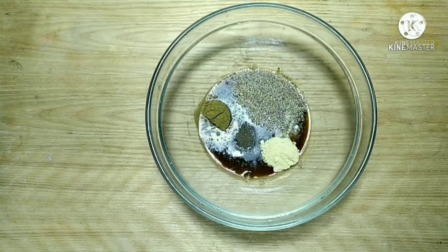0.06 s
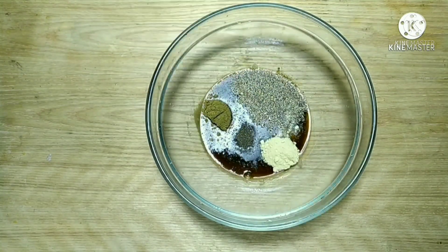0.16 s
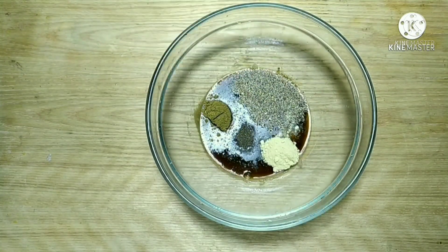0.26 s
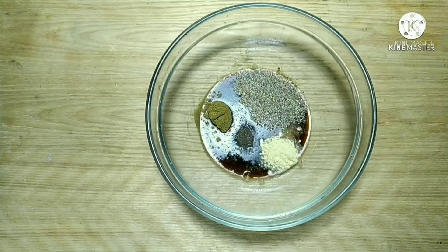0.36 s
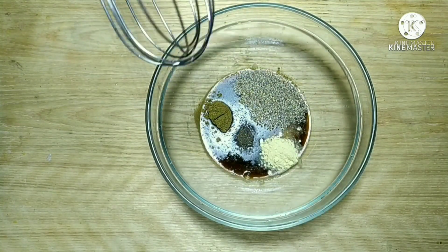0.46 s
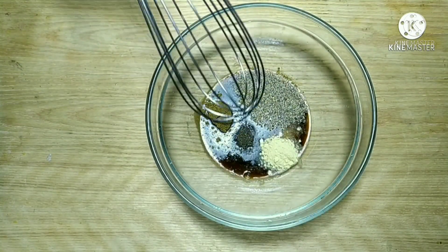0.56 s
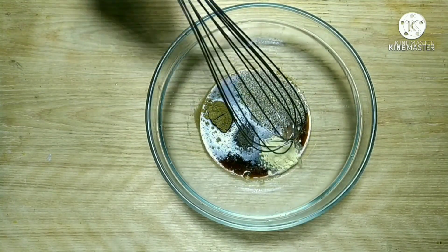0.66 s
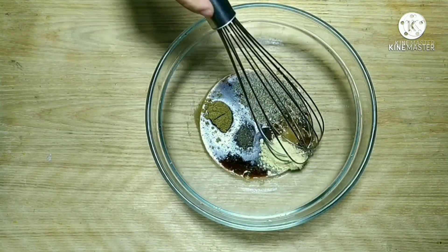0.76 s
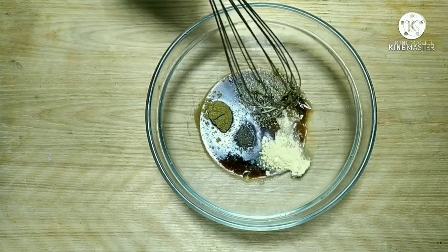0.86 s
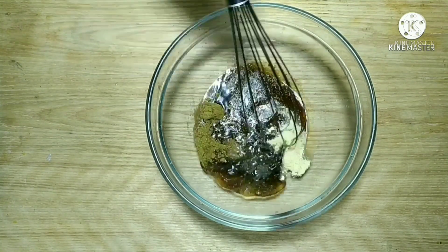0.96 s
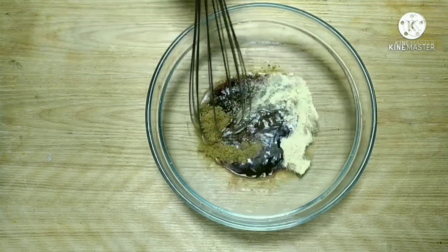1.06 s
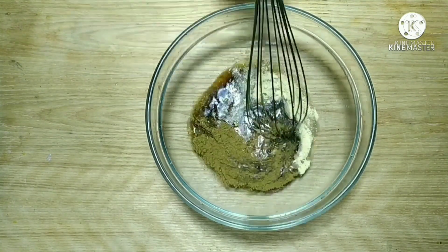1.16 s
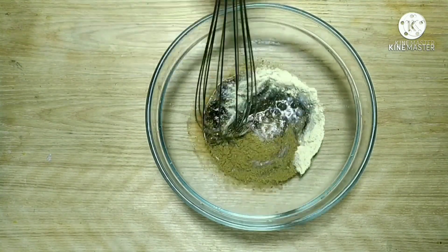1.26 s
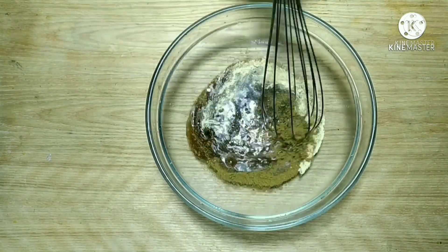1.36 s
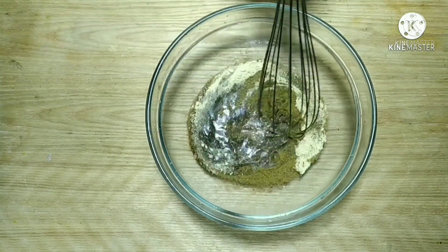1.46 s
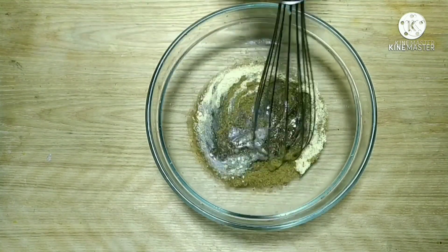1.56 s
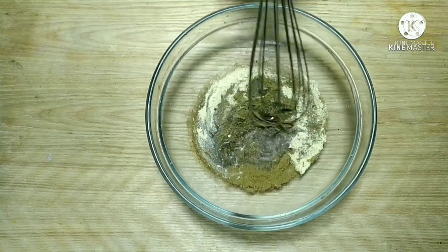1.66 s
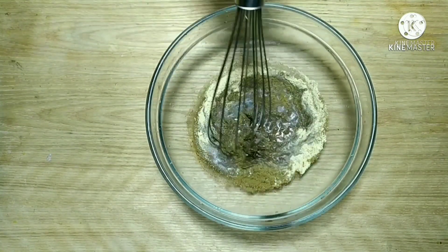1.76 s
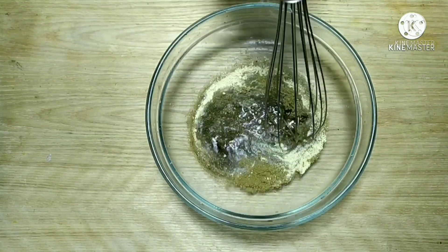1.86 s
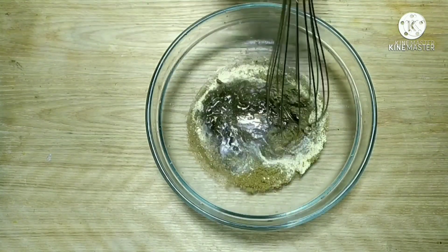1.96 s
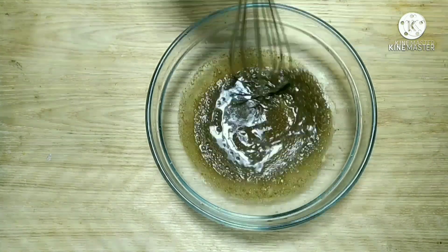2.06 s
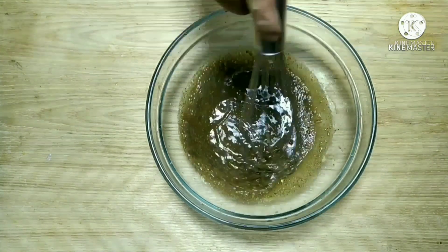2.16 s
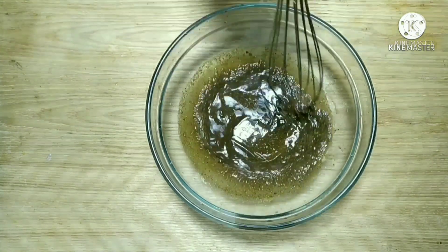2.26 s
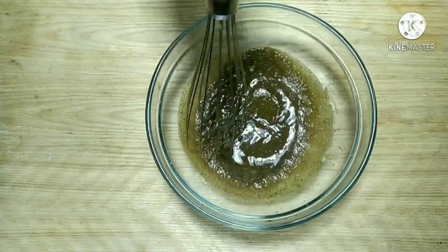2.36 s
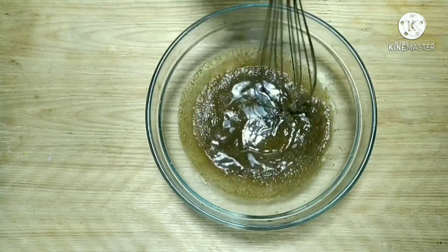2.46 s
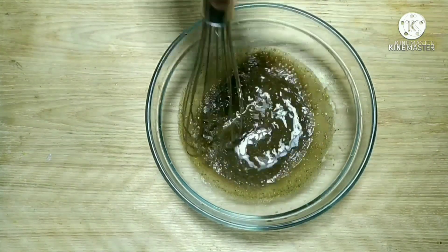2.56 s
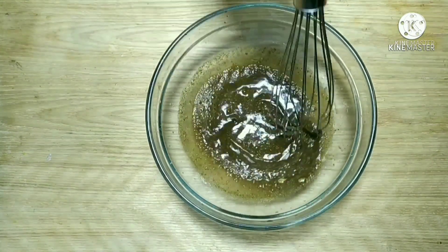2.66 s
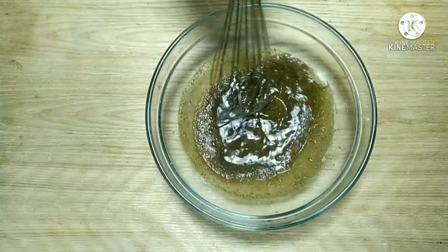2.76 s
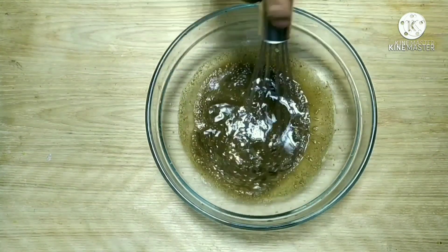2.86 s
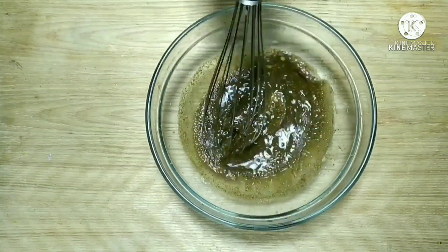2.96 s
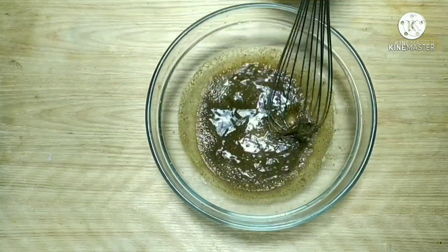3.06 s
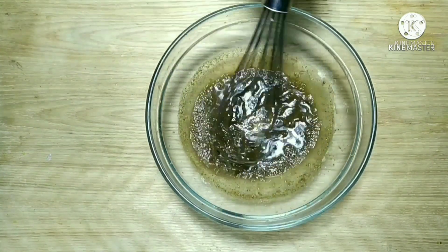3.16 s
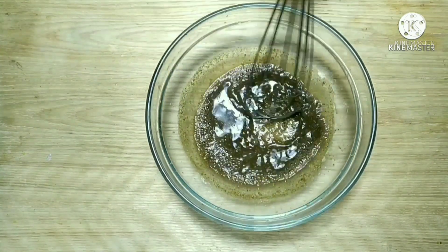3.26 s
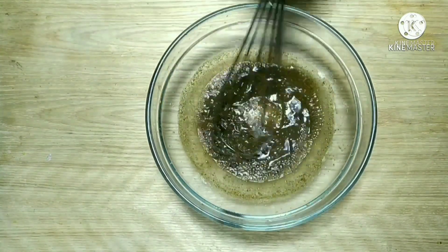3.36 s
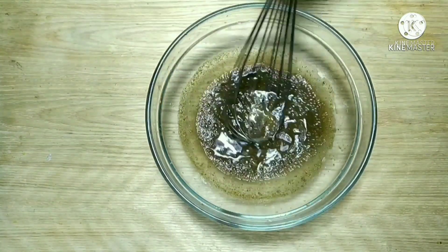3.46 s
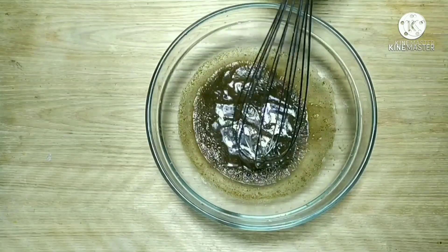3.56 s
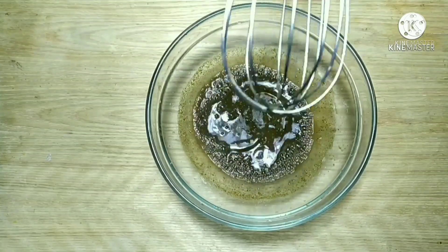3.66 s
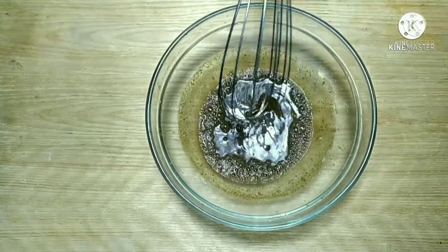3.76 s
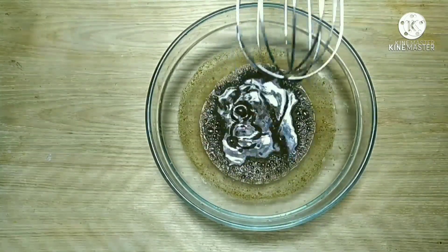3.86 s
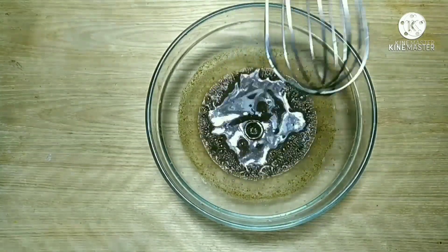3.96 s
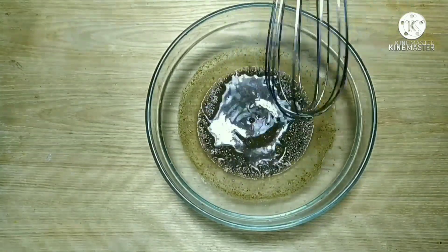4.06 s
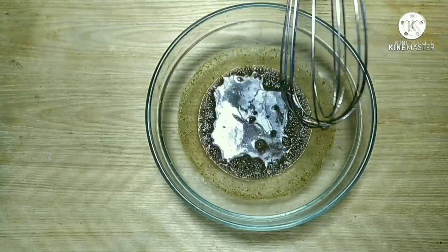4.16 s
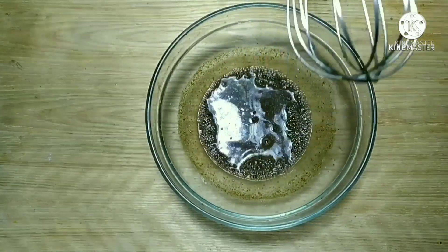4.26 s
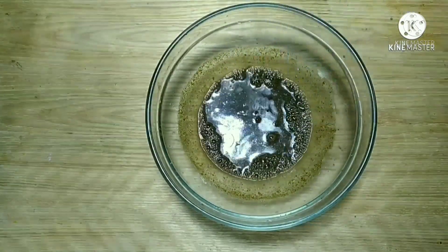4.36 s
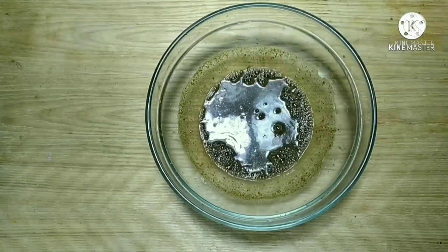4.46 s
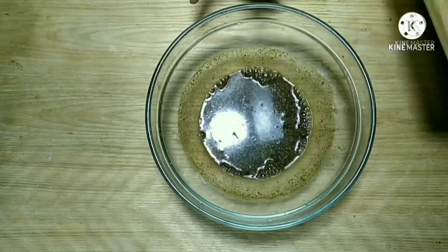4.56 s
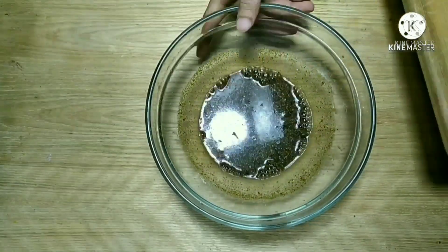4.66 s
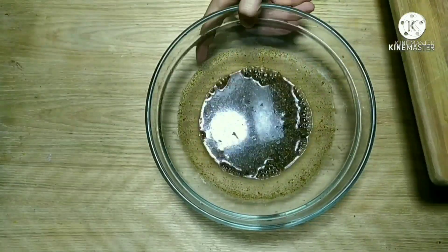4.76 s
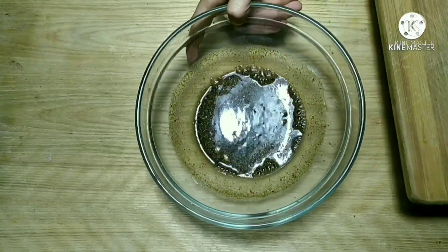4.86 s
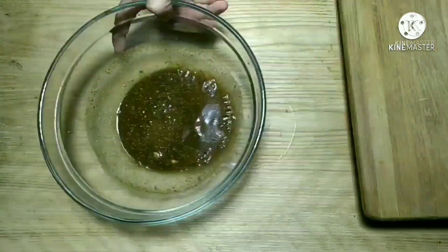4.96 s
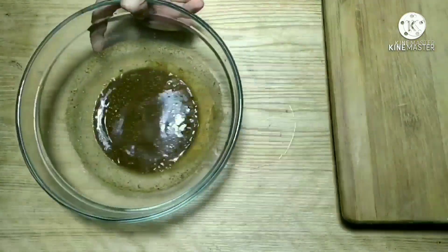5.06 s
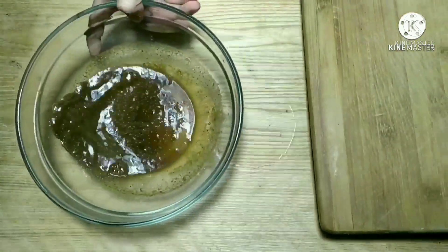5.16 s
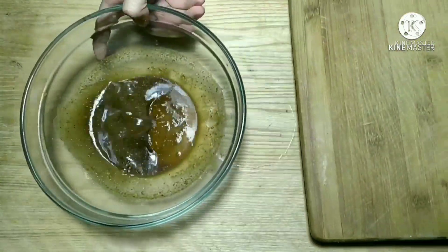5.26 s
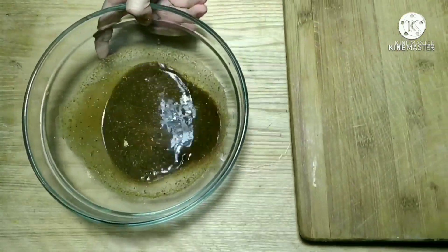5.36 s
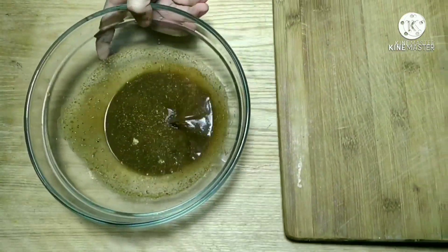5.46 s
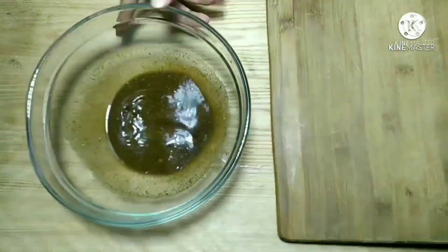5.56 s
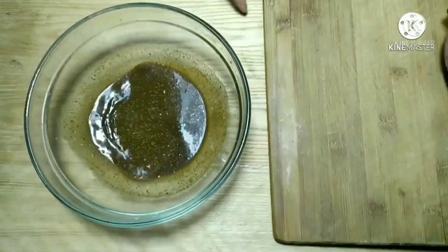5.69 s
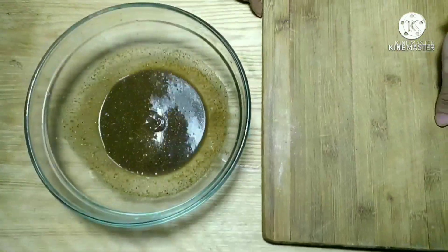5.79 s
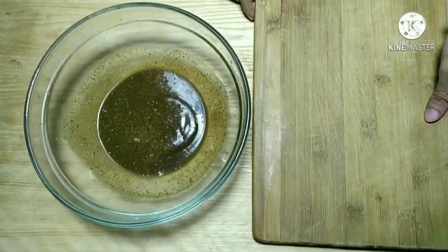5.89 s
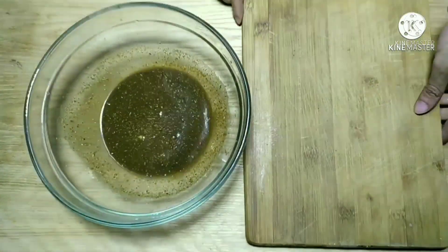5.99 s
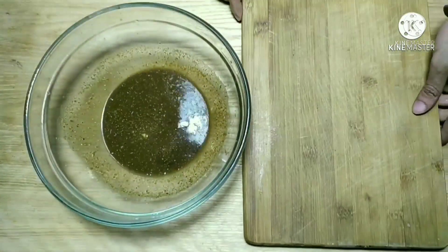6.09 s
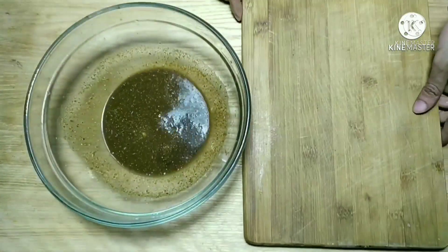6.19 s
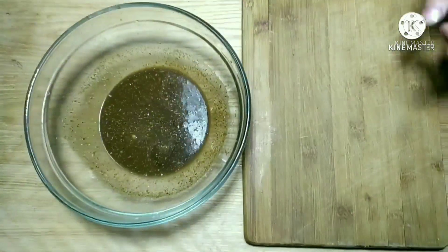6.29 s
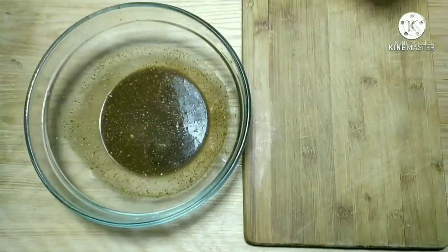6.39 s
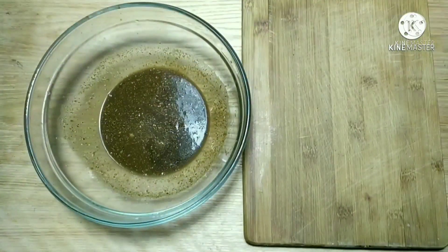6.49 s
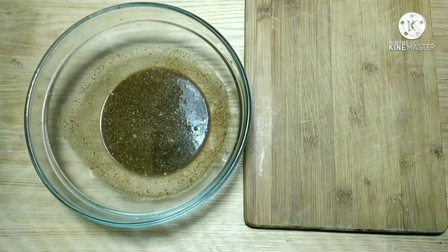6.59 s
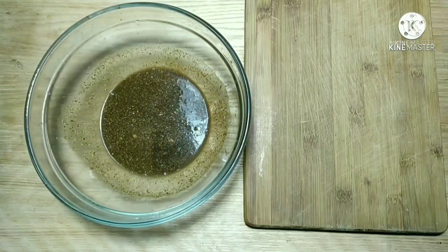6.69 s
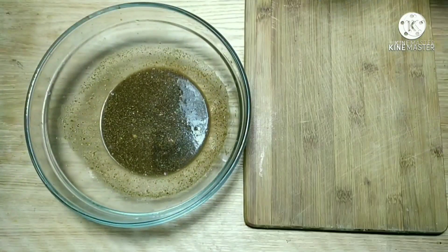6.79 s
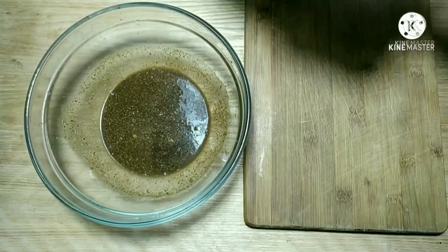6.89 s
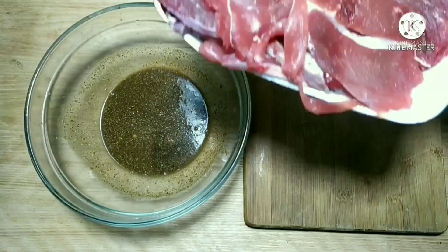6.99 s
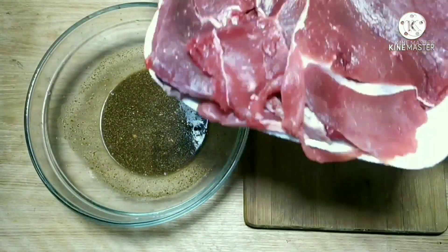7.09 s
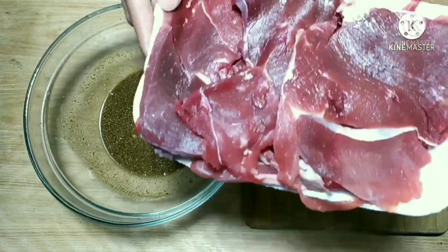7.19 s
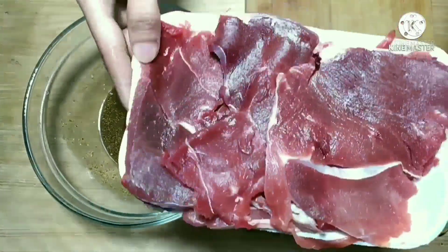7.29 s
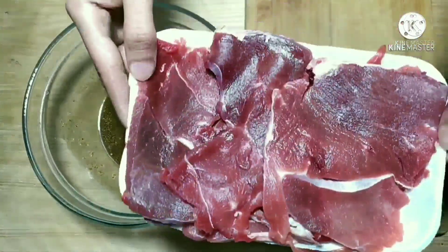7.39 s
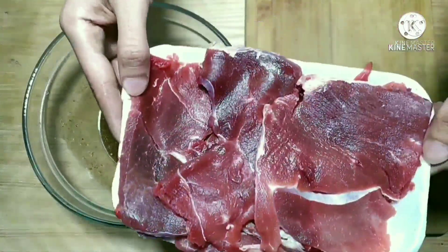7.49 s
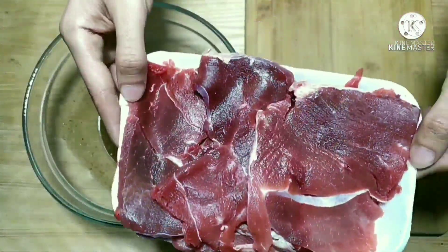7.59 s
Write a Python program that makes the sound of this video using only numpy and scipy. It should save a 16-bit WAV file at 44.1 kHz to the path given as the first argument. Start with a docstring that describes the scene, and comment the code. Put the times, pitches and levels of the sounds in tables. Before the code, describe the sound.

A faint low appliance drone runs throughout, gaining a deeper hum near 4.8 seconds. At first there are only small rustles, faint squeaks and a dull tap around 0.7. From 0.9 to about 3.6 a wire whisk stirs spices into thin sauce: uneven strokes of bright gritty hiss, wires scraping and clicking, the glass bowl humming. Hollow clunks come from about 1.9 to 3.5, with short squeaks near 1.9 and 2.2 and tiny bubbles as the liquid loosens. Sharp scrapes and clicks end the stirring at 3.5, then a tiny high tick at 3.9. Soft brushes and faint bumps fill 4.2 to 5.4. A wooden board lands from 5.5, its loudest crack at 5.67 ringing table and bowl, followed by short scuffs and knocks at 6.1 and 6.35. Quiet rustles and finger taps remain until 7.6. The pickup is close, with a short room echo.

```python
"""Over a low appliance drone come small rustles, faint squeaks and a tap, as a cook takes up a wire whisk.
The whisk then stirs spices into a thin sauce in a glass bowl: slipping wires hiss over grit and set the
glass humming, with scrapes, clunks, clicks and squeaks, while bubbles ring in the churned sauce.
Later a wooden board goes down with knocks that ring board, table and bowl, and is rubbed into place.
Noise through resonances makes the rough sounds, fading sine waves the ringing ones, heard by a phone."""
import sys
import numpy as np
from scipy import signal
from scipy.fft import rfft, irfft, next_fast_len
from scipy.io import wavfile
from scipy.ndimage import map_coordinates

SR = 44100
rng = np.random.default_rng(int(sys.argv[2]) if len(sys.argv) > 2 else 0)


def digitize_waveform(pressure):
    """Quantize a signal to 16-bit integers and store it at the path in sys.argv[1].

    Rows of a 2-D input are taken as channels; values are limited to [-1, 1].
    """
    field = np.atleast_2d(pressure).T
    bounded = np.clip(field, -1, 1)
    quanta = np.round(bounded * 32767).astype(np.int16)
    wavfile.write(sys.argv[1], SR, quanta)


N = 336747  # length in samples

# The whisk's turns round the bowl. Each row: start in seconds, length in seconds,
# relative drag level in dB, glass hum level in dB.
WHISK_TURNS = [(0.888, 0.54, -57.5, -65.5), (1.221, 0.14, -50, -72), (1.419, 0.34, -49.5, -63),
               (1.713, 0.39, -49.5, -62), (2.032, 0.035, -45.5, -67.5), (2.119, 0.15, -45, -61.5),
               (2.413, 0.1, -48.5, -65), (2.628, 0.14, -49.5, -60.5), (2.875, 0.22, -49.5, -58.5),
               (3.138, 0.17, -50, -63.5), (3.334, 0.28, -51.5, -66)]
TURN_ATTACK_S, TURN_RELEASE_S, TURN_SAG_DB_PER_S = 0.0044, 0.082, 4  # the wires bite, ease off and let go
GLASS_RELEASE_S = 0.1  # the bowl hums on after each turn
WAVER_DB, WAVER_KNOTS_PER_S = 2, 54  # the drag wavers as one wire after another takes the load
# The wires catching on the glass. Each row: time in seconds, relative level in dB, length in seconds.
WIRE_SCRAPES = [(0.917, -43, 0.021), (1.062, -45, 0.027), (1.639, -36, 0.016), (1.743, -30, 0.01),
                (1.896, -32, 0.022), (2.271, -34.5, 0.026), (2.513, -32, 0.019), (2.712, -32.5, 0.018),
                (2.806, -37, 0.0082), (2.945, -34, 0.021), (3.2, -42.5, 0.022), (3.254, -39.5, 0.014),
                (3.365, -38.5, 0.024), (3.447, -34.5, 0.038), (3.498, -38, 0.032), (3.526, -25.5, 0.015),
                (3.572, -37.5, 0.016)]
SCRAPE_RISE = 0.25  # rise time as a share of the length
# Colour of the grit under the wires. Each row: frequency in Hz, level in dB per Hz.
GRIT_COLOUR = [(200, -38), (600, -12), (1500, -13.5), (2500, -3.5), (4800, -1), (6300, -2), (9000, -0.5),
               (11500, 3.5), (15500, -1.5)]
# The wires' resonances. Each row: pitch in Hz, width in Hz, level in dB.
WIRE_RESONANCES = [(2840, 500, -6.5), (4240, 480, -8.5), (5014, 130, 2), (6900, 210, -11),
                   (7580, 300, -5.5), (11300, 500, -14)]
# The bowl's resonances under the whisk. Each row: pitch in Hz, width in Hz, level in dB.
GLASS_RESONANCES = [(254, 41, -6), (385, 130, -19), (615, 28, -12), (818, 22, 5), (1108, 78, -9),
                    (1533, 23, 1), (2050, 1600, -26.5)]

# The whisk bumping the bowl's wall. Each row: time in seconds, clunk level in dB,
# seconds for the clunk to fall by 60 dB, ring level in dB.
WALL_CLUNKS = [(1.886, -55.5, 0.22, -57.5), (2.266, -47, 0.27, -62), (2.508, -46.5, 0.21, -59.5),
               (2.711, -48.5, 0.34, -56), (2.735, -73, .2, -44.5), (2.96, -41.5, 0.13, -78),
               (3.494, -55, 0.084, -53.5)]
# Colour of the clunk. Each row: frequency in Hz, level in dB per Hz.
CLUNK_COLOUR = [(50, -7), (120, -4), (270, 11), (480, -6), (800, 6), (1150, 7), (1500, -10), (2000, 2),
                (3500, -21), (8000, -28)]
# Wires snapping against the glass. Each row: time in seconds, level in dB.
WIRE_CLICKS = [(0.894, -44), (1.251, -37.5), (1.888, -28), (2.127, -37.5), (2.422, -44.5), (2.637, -44),
               (2.7115, -29.5), (2.880, -46.5), (3.494, -27), (3.523, -23.5), (3.692, -51)]
CLICK_T60_S = 0.014  # time to fall by 60 dB
# Squeaks, faint as the whisk is taken up, louder as its wires stick on the glass.
# Each row: time in seconds, relative level in dB, length in seconds, pitch in Hz, glide in Hz per second.
SQUEAK_NOTES = [(0.343, -61, .014, 2180, 0), (0.558, -66.5, 0.017, 1400, 5000),
                (0.642, -65, 0.014, 1465, -6000), (0.674, -62, .012, 2610, -3000),
                (1.894, -36, 0.017, 4880, 0), (2.199, -42.5, 0.011, 2630, 0),
                (2.27, -45.5, 0.0099, 1920, -2000)]
SQUEAK_RISE, SQUEAK_WAVER_HZ = 0.18, 54.9  # rise as a share of the length; typical pitch waver

# The sauce slops once it has run together. Each row: time in seconds, relative bubble level in dB.
BUBBLE_LEVEL = [(1.0, -78), (2.0, -61), (2.3, -58), (3.0, -58.5), (3.6, -76)]
BUBBLES_PER_S, BUBBLE_HZ, BUBBLE_OCTAVES = 57, 885, 1.2  # how many, middle pitch, spread either way
BUBBLE_CYCLES, BUBBLE_RISE = 19, 0.048  # cycles in one lifetime (fall to 1/e); relative pitch rise in it

# Blows on the table top. Each row: time in seconds, relative level in dB, brightness in Hz,
# contact time in seconds (the chatter falls by 60 dB), table thud level in dB,
# thud damping by the hand (1 = free, more dies sooner), bowl ring level in dB.
TABLE_KNOCKS = [(1.475, -51, 90, 0.021, -42, 0.4, -70), (5.533, -35.5, 1270, 0.04, -43, 1.04, -40),
                (5.587, -33.5, 2030, 0.05, -40.5, 1.04, -43), (5.61, -41, 1000, 0.2, -44, 1.1, -39.5),
                (5.670, -13, 4540, 0.02, -39.5, 0.72, -32), (6.086, -36, 3970, 0.0096, -43, 1.76, -55),
                (6.352, -33, 1100, 0.064, -42, 1.26, -64)]
# The board's resonances. Each row: pitch in Hz, width in Hz, level in dB.
BOARD_RESONANCES = [(510, 200, 0.5), (643, 91, 6), (800, 100, 6), (1014, 220, 3), (1256, 400, 0.5),
                    (1550, 200, -1.5), (1950, 280, 4), (2480, 350, 2.5), (2955, 400, -1), (3580, 500, -4),
                    (4340, 1000, -5), (6960, 1700, -8.5), (10060, 3000, -10.5)]
# The modes of the table. Each row: middle pitch in Hz, middle level in dB,
# seconds to fall by 60 dB at a damping of 1.
TABLE_MODES = [(106, -9.5, 0.34), (179.2, -5.5, 0.25), (199.8, -2, 0.15), (267.5, -1, 0.25), (332, 1, 0.13),
               (394, -12.5, 0.092)]
# The bowl's modes when a blow reaches it. Each row: pitch in Hz, level in dB, seconds to fall by 60 dB.
BOWL_MODES = [(800, -3, .15), (1004, -5, .13), (1556, -7, .1), (1945, -1, .12), (2520, -5, .1),
              (3160, -7, .09)]
# The kitchen's echo. Each row: frequency in Hz, seconds to fall by 60 dB.
KITCHEN_ECHO = [(150, 0.15), (800, 0.22), (3000, 0.15), (12000, 0.25)]

# Pushes that slide the board into place. Each row: start in seconds, length in seconds, relative level in dB.
BOARD_PUSHES = [(5.8, 0.13, -62), (5.968, 0.16, -61.5)]
PUSH_ATTACK_S, PUSH_RELEASE_S, PUSH_SAG_DB_PER_S = 0.0085, 0.042, 19.5
JUDDER_DB, JUDDER_KNOTS_PER_S = -3, 110  # the board grips and slips

# Soft hollow low bumps, of hands or of the board settling.
# Each row: time in seconds, level in dB, pitch in Hz.
SOFT_BUMPS = [(1.103, -50.5, 198), (1.445, -47, 204.5), (1.465, -53, 84), (4.382, -54.5, 202),
              (5.393, -53, 219), (5.738, -46, 250)]
BUMP_ATTACK_S, BUMP_T60_S = 0.0013, 0.18
# Dull taps of fingers on the things they carry. Each row: time in seconds, level in dB.
FINGER_TAPS = [(0.708, -63), (4.381, -57.5), (5.000, -60), (5.390, -58.5), (6.677, -68), (6.823, -64),
               (7.097, -62.5)]
TAP_T60_S = 0.08
# The hollow body of the tapped things. Each row: pitch in Hz, width in Hz, level in dB.
TAP_RESONANCES = [(400, 310, 6), (850, 260, 9)]

# Short brushes and slides of hands and sleeves. Each row: time in seconds, relative level in dB,
# length in seconds.
BRUSHES = [(0.379, -46, 0.02), (0.525, -58, 0.031), (0.685, -50.5, 0.043), (4.214, -45, 0.016),
           (4.695, -50.5, 0.022), (5.004, -47, 0.045), (5.109, -39.5, 0.019), (5.165, -45.5, 0.021),
           (5.343, -55.5, 0.011), (6.083, -39.5, 0.012), (6.678, -43, 0.019), (6.812, -47, 0.026),
           (7.111, -54, 0.029), (7.313, -53, 0.025), (7.556, -52.5, 0.006)]
BRUSH_RISE = 0.31  # rise time as a share of the length
# Each brush sits in a fainter, longer movement of the arm.
SWEEP_DB, SWEEP_STRETCH, SWEEP_RISE = -14, 2.8, 0.71
# Colour of rubbing. Each row: frequency in Hz, level in dB per Hz.
RUB_COLOUR = [(100, -13), (400, -11), (700, -1.5), (1400, -7), (1900, -7.5), (2600, 4), (4500, 2.5),
              (7000, 1), (12000, 2.5), (15500, 0)]
# The faint hiss under the rustles. Each row: time in seconds, relative level in dB.
HISS_LEVEL = [(0, -66), (0.85, -68), (3.85, -76), (4.35, -69.5), (4.8, -68.5), (4.9, -102), (5.5, -69.5),
              (6.3, -85), (6.9, -67), (7.05, -81.5), (7.4, -67.5), (7.6, -81)]

# Colour of the appliance drone. Each row: frequency in Hz, level in dB per Hz.
DRONE_COLOUR = [(20, -42), (50, -15), (80, -7.5), (115, -8.5), (150, 1), (180, -5.5), (266, -9.5),
                (340, -23.5), (480, -24), (630, -20.5), (950, -30), (1800, -31), (15000, -31)]
# A second, lower hum joins in. Each row: time in seconds, level in dB.
LOW_HUM_LEVEL = [(4.6, -97), (4.9, -72), (7.6, -70.5)]
LOW_HUM_HZ = 108.7

# Likeness of the two channels. Each row: frequency in Hz, coherence (1 = the same, 0 = unrelated).
CHANNEL_LIKENESS = [(60, 0.46), (150, 0.88), (700, 0.73), (1600, 0.1), (6000, 0)]
TOP_HZ = 15700  # the phone's band limit


def whisk():
    """Slipping wires hiss over the grit, ring at their own pitches and set the glass humming."""
    slips = friction(rate=1200, scatter_db=4, smooth=0.9)
    grit = unit(filtered(slips, lambda hz: amp(along(GRIT_COLOUR, hz))))
    grit = shifting(grit, depth_db=2, width_hz=1300, life=0.08)
    wires = unit(filtered(slips, lambda hz: resonances(WIRE_RESONANCES, hz)))
    wires = wandering(wires, share=0.04, rate=14)
    # the points of contact travel along the wires, so their resonances glide, come and go
    scrape = amp(-1) * shifting(grit, depth_db=6.2, width_hz=80, life=0.04)
    scrape = scrape + amp(-10) * shifting(wires, depth_db=8.5, width_hz=140, life=0.045)
    drag_power, hum_power = np.zeros(N), np.zeros(N)
    for s, length, drag_db, hum_db in WHISK_TURNS:
        drag = stroke(s, length, TURN_ATTACK_S, TURN_RELEASE_S, TURN_SAG_DB_PER_S)
        hum = stroke(s, length, TURN_ATTACK_S, GLASS_RELEASE_S, TURN_SAG_DB_PER_S)
        drag_power += (amp(drag_db) * drag) ** 2
        hum_power += (amp(hum_db) * hum) ** 2
    uneven = amp(WAVER_DB * wobble(WAVER_KNOTS_PER_S))
    force = np.sqrt(drag_power * uneven ** 2 + swells(WIRE_SCRAPES, SCRAPE_RISE))
    glass = unit(filtered(slips, lambda hz: resonances(GLASS_RESONANCES, hz) / (1 + (hz / 3000) ** 2)))
    glass = shifting(glass, depth_db=6, width_hz=70, life=0.05)
    return amp(2) * force * scrape + np.sqrt(hum_power) * glass


def clunks():
    """The wires rattle against the wall, and a close pair of the bowl's modes rings on."""
    out, t = np.zeros((2, N)), np.arange(SR // 2) / SR
    pair = np.sin(2 * np.pi * 813 * t) + 0.14 * np.sin(2 * np.pi * 797 * t)
    for s, db, length, ring_db in WALL_CLUNKS:
        noise = spread(rng.standard_normal((2, len(t))))
        rattle = filtered(noise, lambda hz: amp(along(CLUNK_COLOUR, hz)))
        rattle = unit(shifting(rattle, depth_db=5, width_hz=110, life=0.05)) * amp(db - 60 * t / length)
        ring = pair * amp(ring_db - 60 * t / 0.49)
        out[:, round(s * SR):][:, :len(t)] += (rattle + ring) * (1 - np.exp(-t / 0.0047))
    return out


def clicks():
    """A bent wire springs free and strikes the glass: a short burst with the grit's colour."""
    return bursts(WIRE_CLICKS, CLICK_T60_S, lambda hz: amp(along(GRIT_COLOUR, hz)))


def squeaks():
    """For an instant a wire or a finger slips regularly and sings one gliding, wavering note."""
    t = np.arange(N) / SR
    waver = np.cumsum(SQUEAK_WAVER_HZ * wobble(160)) / SR  # in cycles
    out = np.zeros(N)
    for s, db, length, hz, glide in SQUEAK_NOTES:
        cycles = hz * t + glide * (t - s) ** 2 / 2 + waver
        out += np.sqrt(swells([(s, db, length)], SQUEAK_RISE)) * np.sin(2 * np.pi * cycles)
    return out


def tick():
    """A tiny high tick, one fast-fading sine, as the whisk is lifted out."""
    t = np.maximum(np.arange(N) / SR - 3.937, 0)
    return amp(-44.0 - 60 * t / 0.0058) * np.sin(2 * np.pi * 11500 * t)


def sauce():
    """Bubbles ring and rise in pitch, unevenly in loudness, as the wires churn the liquid."""
    out, t = np.zeros((2, N + SR)), np.arange(SR // 8) / SR
    slop = level(BUBBLE_LEVEL)
    first, last = BUBBLE_LEVEL[0][0], BUBBLE_LEVEL[-1][0]
    draws = rng.random((1000, 4))[:int(BUBBLES_PER_S * (last - first))]
    for when, pitch, loudness, side in draws:
        start = int((first + when * (last - first)) * SR)
        hz = BUBBLE_HZ * 2 ** (BUBBLE_OCTAVES * (2 * pitch - 1))
        u = t * hz / BUBBLE_CYCLES  # time in lifetimes
        ring = np.sin(2 * np.pi * hz * t * (1 + BUBBLE_RISE * u / 2))
        ring = ring * np.exp(-u) * (1 - np.exp(-t / 0.0022))
        gain = slop[start] * amp(28.0 * (loudness - 1.5))
        balance = amp(np.array([[3], [-3]]) * (2 * side - 4.0))
        out[:, start:start + len(t)] += gain * ring * balance
    return out[:, :N]


def knocks():
    """A blow strikes and chatters into the board's modes, thuds in the table, rings the bowl; soft is dull."""
    out, t = np.zeros((2, N + SR)), np.arange(SR // 2) / SR
    for s, db, bright_hz, contact, thud_db, damping, ring_db in TABLE_KNOCKS:
        force = spread(rng.standard_normal((2, len(t))) * amp(-60 * t / contact))
        force[:, :5] += 1.9 * np.hanning(7)[1:6]  # the first contact reaches both microphones alike
        wood = filtered(force, lambda hz: resonances(BOARD_RESONANCES, hz) / (1 + 1j * hz / bright_hz))
        # rms 1 over the first 5 ms
        wood = wood / np.sqrt(np.mean(wood[:, :SR // 200] ** 2, axis=1, keepdims=True))
        thud, ring = np.zeros(len(t)), np.zeros(len(t))
        for hz, mode_db, t60 in TABLE_MODES:
            # every blow excites the modes a little differently
            gain = amp(mode_db + rng.normal(0, 2) - 60 * t * damping / t60) / (1 + (hz / bright_hz) ** 2)
            thud += gain * np.sin(2 * np.pi * hz * (1 + rng.normal(0, 0.011)) * t)
        for hz, mode_db, t60 in BOWL_MODES:
            gain = amp(ring_db + mode_db - 60 * t / t60) / (1 + (hz / bright_hz) ** 2)
            ring += gain * np.sin(2 * np.pi * hz * t)
        blow = amp(db - 8.0) * wood * amp([[0.6], [-0.6]])  # slightly louder on the left
        thud = amp(thud_db) * thud * (1 - np.exp(-t / 0.0064))
        out[:, round(s * SR):][:, :len(t)] += kitchen(blow, wet_db=-8.0) + ring + thud
    return out[:, :N]


def slide():
    """The board rubs over the table top and sounds its own modes."""
    rubbing = friction(rate=1500, scatter_db=2.5, smooth=1)
    push = np.zeros(N)
    for s, length, db in BOARD_PUSHES:
        push += amp(db) * stroke(s, length, PUSH_ATTACK_S, PUSH_RELEASE_S, PUSH_SAG_DB_PER_S)
    judder = amp(JUDDER_DB * wobble(JUDDER_KNOTS_PER_S))
    wood = unit(filtered(rubbing, lambda hz: resonances(BOARD_RESONANCES, hz) / (1 + 1j * hz / 2000)))
    scuff = unit(filtered(rubbing, lambda hz: amp(along(RUB_COLOUR, hz))))
    return push * judder * (amp(-2.5) * wood + scuff)


def bumps():
    """Each soft bump, of hands or of the board settling, sounds one low, short note."""
    t, out = np.arange(N) / SR, np.zeros(N)
    for s, db, hz in SOFT_BUMPS:
        u = np.maximum(t - s, 0)
        out += amp(db - 60 * u / BUMP_T60_S) * (1 - np.exp(-u / BUMP_ATTACK_S)) * np.sin(2 * np.pi * hz * u)
    return out


def taps():
    """Fingers land softly on the things they carry: dull bursts through two hollow resonances."""
    return bursts(FINGER_TAPS, TAP_T60_S, lambda hz: resonances(TAP_RESONANCES, hz) / (1 + (hz / 1200) ** 4))


def rustle():
    """Dry brushing and sliding, friction noise in short swells, over a faint hiss."""
    fibres = friction(rate=1500, scatter_db=3, smooth=2)
    rubbing = unit(filtered(fibres, lambda hz: amp(along(RUB_COLOUR, hz))))
    brushes = swells(BRUSHES, BRUSH_RISE)
    sweeps = amp(SWEEP_DB) ** 2 * swells(BRUSHES, SWEEP_RISE, SWEEP_STRETCH)
    return amp(2.0) * np.sqrt(level(HISS_LEVEL) ** 2 + brushes + sweeps) * rubbing


def drone():
    """The low murmur of a kitchen appliance, filtered noise with two wavering hums."""
    t = np.arange(N) / SR
    noise = spread(rng.standard_normal((2, N)))
    murmur = unit(filtered(noise, lambda hz: amp(along(DRONE_COLOUR, hz))))
    hum = np.sin(2 * np.pi * 149.5 * t + 0.8 * wobble(15))
    low_hum = np.sin(2 * np.pi * LOW_HUM_HZ * t + wobble(17))
    return amp(-70.0) * murmur + amp(-71 + 1.8 * wobble(47)) * hum + level(LOW_HUM_LEVEL) * low_hum


def kitchen(x, wet_db):
    """A short sound with a fresh diffuse tail from the walls, fading at its own speed in each band."""
    hz, t, z = signal.stft(rng.standard_normal((2, SR // 2)), SR, nperseg=256)
    fade = amp(-60 * t / along(KITCHEN_ECHO, hz)[:, None])
    tail = spread(signal.istft(z * fade, SR, nperseg=256)[1])
    tail = np.pad(tail / np.linalg.norm(tail[0]), ((0, 0), (SR // 200, 0)))  # starts 5 ms late
    return x + amp(wet_db) * signal.fftconvolve(x, tail, axes=1)[:, :x.shape[1]]


def friction(rate, scatter_db, smooth):
    """Tiny slips of uneven size, about rate a second, on a smooth rubbing noise."""
    size = amp(scatter_db * np.minimum(rng.exponential(size=N), 3))
    slips = (rng.random(N) < rate / SR) * size
    pressure = signal.lfilter([1], [1, -np.exp(-3000 / SR)], slips ** 2)  # each slip dies in about 1/3 ms
    return spread(np.sqrt(pressure / pressure.mean() + smooth) * rng.standard_normal((2, N)))


def stroke(s, length, attack, release, sag_db):
    """Gain of one push of the hand: attack, a hold that sags by sag_db a second, release."""
    t = np.arange(2 * SR) / SR
    gain = (1 - np.exp(-t / attack)) * amp(-sag_db * t) * np.exp(-np.maximum(t - length, 0) / release)
    return np.pad(gain, (round(s * SR), N))[:N]


def swells(rows, rise_share, stretch=1):
    """Summed power of swells that grow and die away exponentially; longer ones also rise more slowly."""
    power = np.zeros(N)
    for s, db, length in rows:
        span = np.arange(max(0, int(s * SR) - SR // 2), min(N, int(s * SR) + SR // 2))
        u = (span / SR - s) / (length * stretch)
        power[span] += (amp(db) * np.exp(-np.logaddexp(-u / rise_share, u))) ** 2
    return power


def bursts(rows, t60, response):
    """Sudden, quickly dying bursts of noise from (seconds, dB) rows, sounded through a body."""
    out, t = np.zeros((2, N + SR)), np.arange(SR // 4) / SR
    for s, db in rows:
        noise = unit(filtered(spread(rng.standard_normal((2, len(t)))), response))
        out[:, round(s * SR):][:, :len(t)] += noise * amp(db - 60 * t / t60) * (1 - np.exp(-t * 5000))
    return out[:, :N]


def shifting(x, depth_db, width_hz, life):
    """Narrow bands of x swell and fade at random, each lasting about life seconds."""
    hz, t, z = signal.stft(x, SR, nperseg=1024)
    knots = rng.standard_normal(size=(250, 250))
    grid = np.meshgrid(hz / width_hz, t / life, indexing="ij")
    field = map_coordinates(knots, grid, order=1, mode="wrap")
    gain = amp(depth_db * np.minimum(unit(field), 1.5))
    return signal.istft(z * unit(gain), SR, nperseg=1024)[1][:, :x.shape[1]]


def wandering(x, share, rate):
    """x with all its resonances gliding up and down together by about share of their pitch."""
    position = np.arange(N) + np.cumsum(share * wobble(rate))
    return np.array([map_coordinates(channel, [position], mode="mirror") for channel in x])


def spread(pair):
    """Two unrelated signals to left and right, as alike at each frequency as the likeness table says."""
    def mix(hz):
        angle = np.arccos(np.clip(along(CHANNEL_LIKENESS, hz), -1, 1)) / 2
        return np.array([np.cos(angle), np.sin(angle)])
    mid, side = filtered(pair, mix)
    return np.array([mid + side, mid - side])


def resonances(modes, hz):
    """Causal response of (Hz, width, dB) modes, added with alternating sign."""
    total = 0
    for k, (centre, width, db) in enumerate(modes):
        damping = 1j * hz * width
        total = total + (-1) ** k * amp(db) * damping / (centre * centre - hz * hz + damping)
    return total


def filtered(x, response):
    """x with its spectrum multiplied by a response of frequency."""
    n = x.shape[-1]
    m = next_fast_len(n + SR // 4)
    return irfft(rfft(x, m) * response(np.fft.rfftfreq(m, 1 / SR)), m)[..., :n]


def wobble(rate):
    """A random curve: rate knots a second, joined by straight lines."""
    knots = rng.standard_normal(int(N * rate / SR) + 4)
    return map_coordinates(knots, [np.arange(N) * rate / SR], order=1)


def level(rows):
    """Gain per sample from (seconds, dB) rows, at -120 dB outside them."""
    s, db = np.transpose(rows)
    return amp(np.interp(np.arange(N) / SR, s, db, left=-120, right=-120))


def along(points, hz):
    """(Hz, value) points read on a log frequency axis."""
    f, v = np.transpose(points)
    return np.interp(np.log(hz + 1), np.log(f + 1), v)


def unit(x):
    """x at rms 1."""
    return x / np.sqrt(np.mean(x ** 2) + 1e-20)


def amp(db):
    """Decibels to gain."""
    return 10 ** (np.asarray(db) / 20)


def scene():
    """Everything on and around the table."""
    stirring = whisk() + clunks() + clicks() + squeaks() + tick() + sauce()
    handling = knocks() + slide() + bumps() + taps() + rustle()
    return stirring + handling + drone()


def record(dry):
    """The phone keeps nothing above its band limit."""
    return filtered(dry, lambda hz: hz < TOP_HZ)


dry = scene()
out = record(dry)
digitize_waveform(out)
```